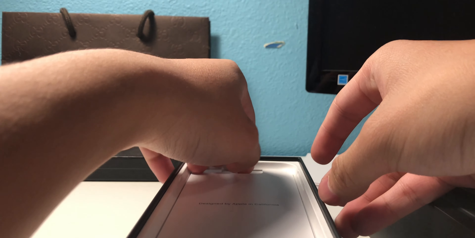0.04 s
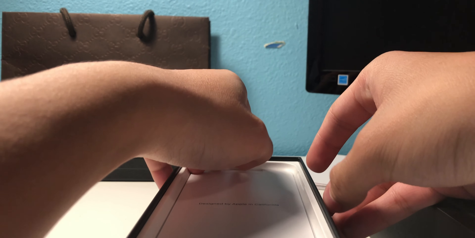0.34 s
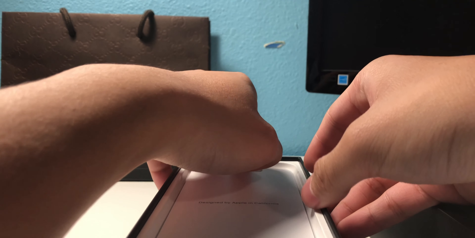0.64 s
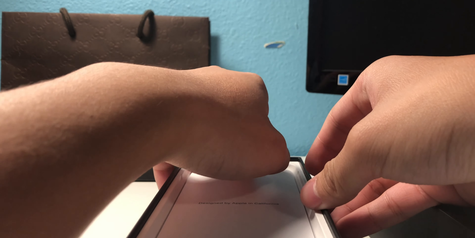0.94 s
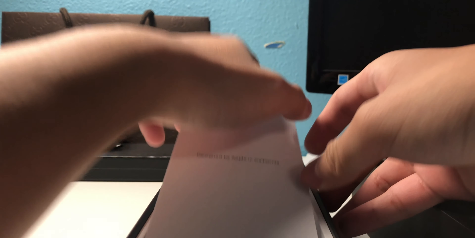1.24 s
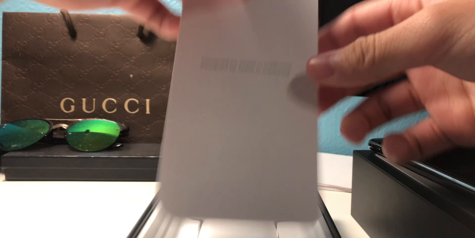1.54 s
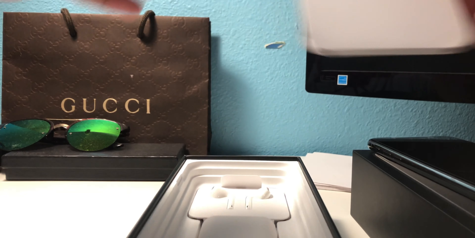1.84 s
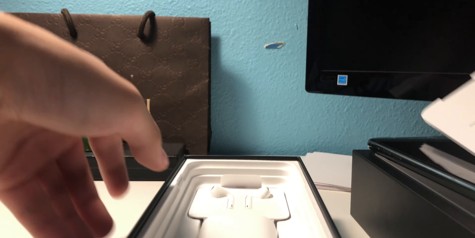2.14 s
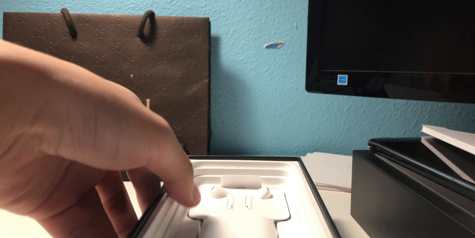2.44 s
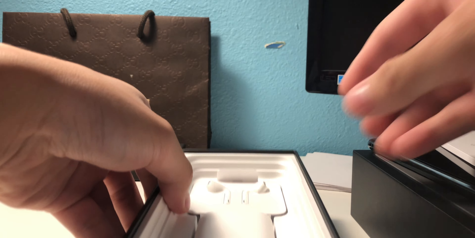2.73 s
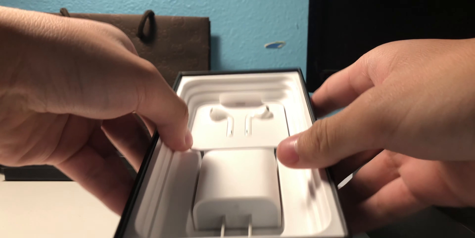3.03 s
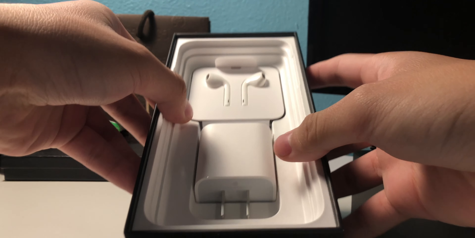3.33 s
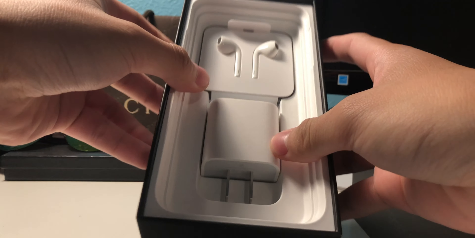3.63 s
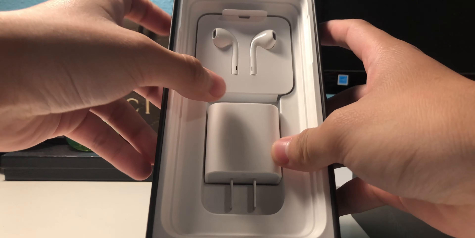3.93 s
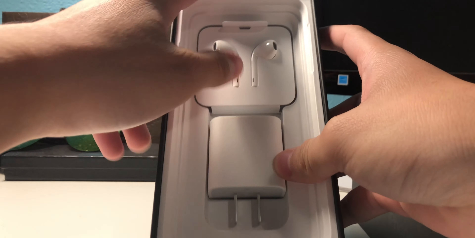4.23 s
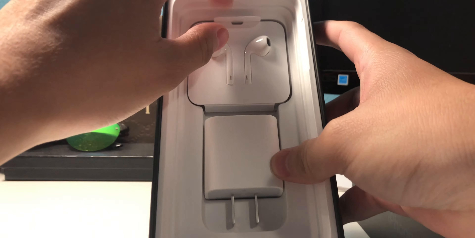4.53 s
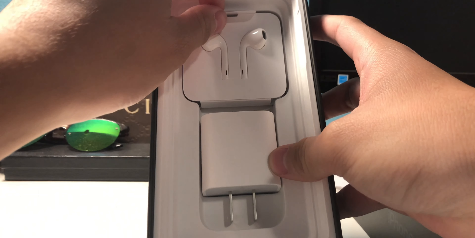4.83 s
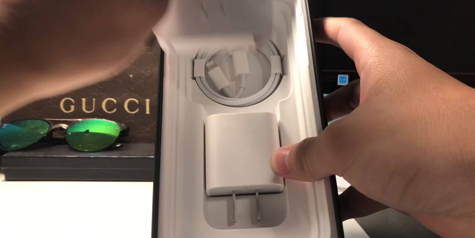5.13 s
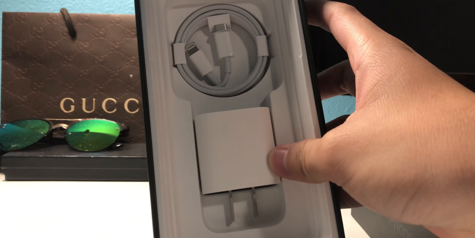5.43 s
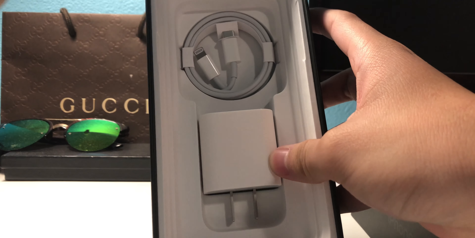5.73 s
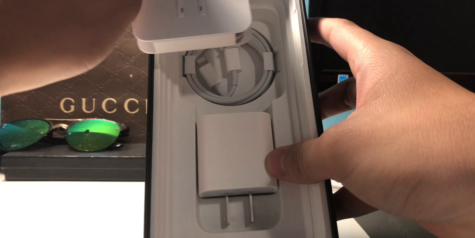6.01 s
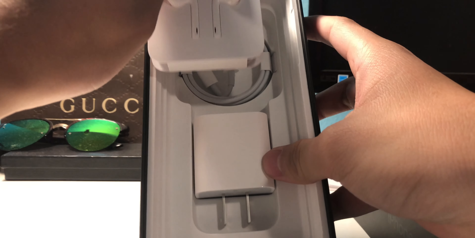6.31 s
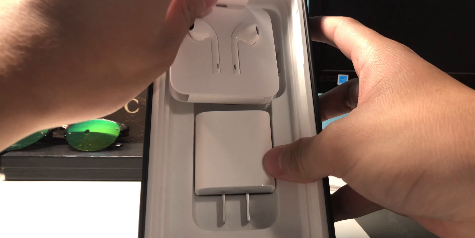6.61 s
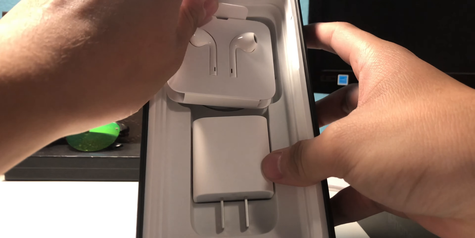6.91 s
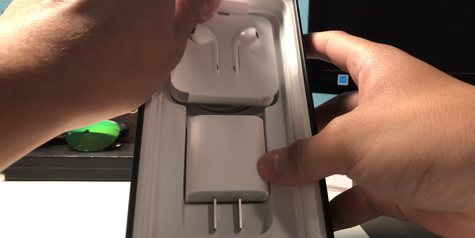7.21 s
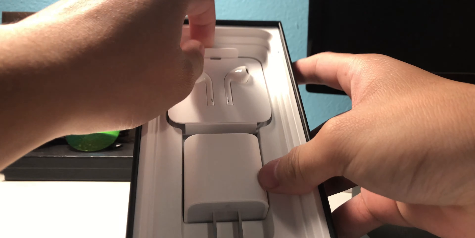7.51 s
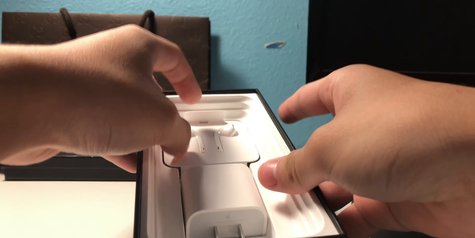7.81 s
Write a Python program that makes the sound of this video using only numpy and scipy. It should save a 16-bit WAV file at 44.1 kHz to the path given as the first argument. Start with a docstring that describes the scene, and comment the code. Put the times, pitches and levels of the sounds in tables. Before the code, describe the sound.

Hands unpack a small cardboard box close by, card scraping and clicking lightly, with dull bumps in a quiet room.

```python
"""Card and paper slide and catch as hands unpack a small box over a desk, close by in a small room.
Stick-slip friction excites a sleeve, inserts and a tray, each heard through its own resonances.
Impacts of edges and fingernails make taps; soft pushes drive the low modes of the held box and
the standing waves of the room. A faint hum and the noise of the room's air lie underneath."""
import sys
import numpy as np
from scipy import signal
from scipy.fft import rfft, irfft, next_fast_len
from scipy.io import wavfile
from scipy.ndimage import uniform_filter1d, map_coordinates

SR = 44100
rng = np.random.default_rng(int(sys.argv[2]) if len(sys.argv) > 2 else 0)


def store_wav(level_fs):
    """Save 16-bit WAV to argv[1]."""
    pcm = np.round(np.clip(np.atleast_2d(level_fs), -1, 1) * 32767)
    wavfile.write(sys.argv[1], SR, pcm.T.astype(np.int16))


N = 346626


def amp(db):
    """Amplitude ratio of a level in decibels."""
    return 10 ** (np.asarray(db) / 20)


def unit(x):
    """Normalisation to an rms of 1."""
    return x / np.sqrt(np.mean(x ** 2) + 1e-20)


def along(points, hz):
    """Interpolation of (f/Hz, value) points on a logarithmic frequency axis."""
    f, values = np.transpose(points)
    return np.interp(np.log(hz + 1), np.log(f + 1), values)


def wobble(per_s, size=N):
    """Smooth random modulation: a spline through per_s Gaussian knots a second."""
    knots = rng.standard_normal(int(size * per_s / SR) + 4)
    return map_coordinates(knots, [np.arange(size) * per_s / SR], order=2)


def filtered(x, response):
    """Linear filtering: the spectrum of x times a frequency response."""
    padded = next_fast_len(len(x) + 4096, True)
    return irfft(rfft(x, padded) * response(np.fft.rfftfreq(padded, 1 / SR)), padded)[:len(x)]


def minimum_phase(gain):
    """Causality: folding the cepstrum gives the minimum-phase response with this gain."""
    cepstrum = irfft(np.log(np.maximum(gain, 1e-5)))
    half = len(cepstrum) // 2
    cepstrum[1:half] *= 2
    cepstrum[half + 1:] = 0
    return np.exp(rfft(cepstrum))


def band(hz, lo_hz, hi_hz, order=4):
    """Band-pass gain with soft edges."""
    return 1 / np.sqrt((1 + (lo_hz / (hz + 1)) ** (2 * order)) * (1 + (hz / hi_hz) ** (2 * order)))


def bending(hz, cycles, corner_hz):
    """Dispersion: low bending waves travel more slowly in card, so they arrive later."""
    return np.exp(-2j * np.pi * cycles * np.log(1 + hz / corner_hz))


def add(track, at_s, sound):
    """Superposition of a sound on the track, starting at at_s."""
    start = max(round(at_s * SR), 0)
    track[start:start + len(sound)] += sound[:max(len(track) - start, 0)]


# spectrum of the room's air: (f/Hz, relative level/dB)
AIR_SPECTRUM = [(22, -22), (58, 0.5), (90, -3.5), (150, -6), (220, -17.5), (340, -17), (500, -22),
                (800, -29.5), (1800, -32.5), (8500, -34.5), (14000, -40), (16000, -45)]

def room_air():
    """Stationary random noise, strongest in the bass."""
    return amp(-61.5) * unit(filtered(rng.standard_normal(N), lambda hz: amp(along(AIR_SPECTRUM, hz))))


# tones of the hum: (f/Hz, relative level/dB)
HUM_TONES = [(59.2, -62.5), (118.4, -65), (145.3, -66.5)]

def hum():
    """Slow amplitude and phase modulation makes three low tones slightly unsteady."""
    out, t = np.zeros(N), np.arange(N) / SR
    for hz, db in HUM_TONES:
        out += amp(db + 0.46 * wobble(2.28)) * np.sin(2 * np.pi * hz * t + 0.59 * wobble(3.245))
    return amp(-0.5) * out


# reverberation time of the room: (f/Hz, T60/s)
ROOM_DECAY = [(200, 0.36), (2000, 0.21), (6000, 0.14), (14000, 0.16)]

def in_room(x, wet_db):
    """Reverberation: direct sound, a ceiling echo and a diffuse tail whose treble dies first."""
    hz, t, spectra = signal.stft(rng.standard_normal(SR // 3), SR, nperseg=256)
    tail = signal.istft(spectra * amp(-60 * t / along(ROOM_DECAY, hz)[:, None]), SR, nperseg=256)[1]
    tail *= 1 - np.exp(-(np.arange(len(tail)) / SR / 0.0031) ** 2)
    response = np.r_[1, amp(wet_db) * tail / np.linalg.norm(tail)]
    response[round(0.0087 * SR)] += amp(wet_db - 6.5)  # ceiling echo
    return signal.fftconvolve(x, response)


# low modes of the held box: (f/Hz, bandwidth/Hz, relative level/dB)
BOX_MODES = [(63.5, 17, -6.5), (130.4, 31, -1), (240, 17, -8), (314, 34, -10.5), (544, 89, -21)]
# standing waves between desk and walls: (f/Hz, relative level/dB, T60/s)
ROOM_MODES = [(116.9, -5, 0.63), (138.2, 4.5, 0.29), (161, -9, 0.66), (229.8, -2.5, 0.52), (336, 8.5, 0.45)]
# soft pushes on the box: (t/s, relative peak level/dB, hardness as gain above 320 Hz/dB)
PUSHES = [(0.804, -43.5, -1), (0.921, -43, 6), (0.98, -41, 1), (1.056, -52, -3), (1.372, -43.5, -14),
          (1.464, -45, -18), (1.709, -43.5, -2.5), (1.797, -50, -7), (2.083, -45, -17), (2.411, -31, -11.5),
          (2.534, -38.5, 4.5), (4.277, -28, -21.5), (4.482, -33, -17), (4.902, -25, -13.5),
          (5.899, -38, -21), (6.264, -34, -36), (6.324, -36, 10), (6.366, -34.5, -14), (6.63, -43.5, 11),
          (6.856, -32.5, -13), (7.125, -46, -3), (7.359, -28, -6.5), (7.64, -36, -24), (7.796, -41.5, -3.5)]

def box_thumps(size=16384):
    """Modal response: a push on the box disperses into a falling swoop and excites standing waves."""
    out, t, hz = np.zeros(N), np.arange(size) / SR, np.fft.rfftfreq(size, 1 / SR)
    body = np.sqrt(sum((amp(db) / np.hypot(1, (hz ** 2 - f ** 2) / (width * (hz + 1)))) ** 2
                       for f, width, db in BOX_MODES))
    boom = sum(amp(db - 60 * t / t60) * np.sin(2 * np.pi * f * t) for f, db, t60 in ROOM_MODES)
    boom *= 1 - np.exp(-t / 0.008)
    boom /= np.abs(rfft(boom)).max()
    shelf = np.clip(np.log2((hz + 1) / 160), 0, 1)
    for at_s, db, hardness_db in PUSHES:
        contact = amp(hardness_db * shelf) * band(hz, lo_hz=59, hi_hz=510, order=3)
        push = irfft(minimum_phase(body * contact) * bending(hz, cycles=1.52, corner_hz=40.6))
        push *= amp(db + 1) / np.abs(push).max()
        add(out, at_s - 0.004, push + amp(7) * signal.fftconvolve(push, boom)[:size])
    return out


# resonances of each piece: (f/Hz, bandwidth/Hz, level above plain card/dB)
SLEEVE = [(555, 62, 3.5), (738, 160, 9.5), (2170, 530, 2), (2700, 390, 2.5), (4030, 1700, 5.5),
          (5100, 310, 2), (6070, 300, 4), (7400, 390, 0)]
INSERTS = [(750, 83, 6.9), (1200, 140, 2.9), (2670, 100, 6), (3557, 640, 3), (8500, 730, 1.8),
           (13700, 2900, 7.7)]
TRAY_FLAP = [(541, 30, 6.8), (805, 160, 5.1), (1190, 115, 7.5), (1690, 130, 7.5), (3290, 520, 8.1),
             (4120, 320, 5.3), (5000, 270, 5.3), (5900, 170, 5.5), (6700, 330, 5.7), (7620, 210, 6.2),
             (8460, 180, 6.7), (11940, 1100, 4.7)]
BOX_WELL = [(795, 260, 8.7), (2200, 240, 6.3), (2760, 250, 3.6), (3260, 250, 3.9), (4900, 400, 3),
            (13200, 3100, 3.6)]
TRAY = [(457, 73, 4.3), (818, 180, 7.8), (1141, 160, 5.3), (1705, 160, 5.6), (3030, 670, 5.5),
        (4100, 710, 3), (5050, 320, 4.1), (5730, 370, 3.4), (7060, 480, 3.4)]
# the piece in the hands: (starting t/s, resonances)
PIECES = [(0, SLEEVE), (1.75, INSERTS), (2.95, TRAY_FLAP), (5.6, BOX_WELL), (6.1, TRAY)]

def card_resonance(hz, at_s):
    """Resonance: the piece held at time at_s raises the gain around each of its modes."""
    modes = [modes for start, modes in PIECES if start <= at_s][-1]
    return amp(sum(db / (1 + (2 * (hz - f) / width) ** 2) for f, width, db in modes))


# spectrum common to all taps: (f/Hz, relative level/dB)
TAP_SPECTRUM = [(120, -20), (280, 1.5), (500, -0.5), (2000, -2), (5000, -2.5), (8000, -3.5), (13500, -11.5),
                (16000, -19)]
# edges and nails striking card:
# (t/s, relative level/dB, hardness as tilt/(dB per octave), T60/s, ring f/Hz, ring level/dB)
IMPACTS = [ (0.054, -48.5, 0, 0.012, 650, 17), (0.146, -44, -3.5, 0.014, 643, 9),
           (0.163, -42.5, 0, .012, 635, 14), (0.281, -47, -1.5, .015, 640, 9),
           (0.3282, -35, 0.5, 0.0089, 1090, 12.5), (0.4, -48, -4.5, .014, 679, 5),
           (0.667, -49, 2, 0.017, 540, 21), (0.796, -48, -5, .018, 610, 15),
           (0.841, -48.5, 0.5, 0.026, 534, 18), (0.922, -42.5, -1.5, 0.009, 574, 13),
           (0.9786, -37, -1.5, .004, 600, 10.5), (0.991, -39.5, -4.5, 0.01, 4450, 11),
           (1.002, -41.5, -5, 0.0073, 5300, 9), (1.055, -29, -4, 0.0082, 5370, 21),
           (1.162, -45.5, -2, 0.014, 6320, 9), (1.356, -42, 4.5, 0.0082, 740, 19.5),
           (1.385, -39, -2.5, 0.031, 510, 12.5), (1.46, -42.5, -6, 0.064, 564, 31),
           (1.615, -36, -0.5, 0.017, 2540, 18.5), (1.69, -48, -1, .015, 2620, 15),
           (2.131, -55.5, 3.5, 0.01, 4560, 15), (2.241, -34.5, -1, 0.0052, 3850, 15.5),
           (2.368, -56, -3, .01, 4200, 8), (2.406, -40.5, -4, 0.057, 2070, 6.5),
           (2.445, -51, -3.5, .008, 4400, 11), (2.452, -51.5, -5.5, 0.011, 4500, 21),
           (2.665, -52.5, -0.5, 0.012, 6200, 3), (2.688, -47, 1, 0.024, 537, 10),
           (2.813, -44, 1.5, 0.0055, 1730, 4), (2.9874, -40.5, -6, 0.017, 1150, 6.5),
           (3.039, -57, -10, 0.017, 740, 7), (3.094, -53, -4.5, 0.015, 1160, -1),
           (4.269, -42.5, -7, 0.017, 510, 8.5), (4.381, -40.5, -5.5, 0.028, 970, 13.5),
           (4.461, -45, -5, 0.042, 520, 4), (4.5716, -49, -6.5, 0.0062, 5900, 26),
           (4.7456, -35, 0.5, 0.0055, 1600, 16.5), (4.871, -56.5, -1.5, 0.015, 1740, 4),
           (4.895, -40.5, -6.5, 0.025, 550, 7.5), (5.026, -34, 1, 0.0086, 4370, 15),
           (5.034, -34, 2, 0.011, 5300, 13), (5.046, -33, 3, 0.011, 1540, 14),
           (5.058, -33, 0.5, 0.0076, 3300, 9), (5.889, -33, -2, 0.021, 2320, 5.5),
           (6.3199, -26, -0.2, .005, 1850, 7), (6.348, -44, -6, 0.024, 2070, 11),
           (6.365, -42, -1, 0.091, 5960, 12), (6.393, -38.5, -7, 0.056, 560, 9.5),
           (6.411, -35, -3, 0.0071, 3000, 8.5), (6.593, -40, 0, 0.04, 3100, 1),
           (6.627, -31.5, -4.5, 0.02, 1090, 7.5), (6.6725, -45, -2, 0.012, 3950, 19),
           (6.736, -42, 0, 0.015, 1180, 17), (6.755, -44, -0.5, 0.076, 1380, 12),
           (6.791, -44.5, -3.5, 0.0064, 3180, 13.5), (6.833, -42, -1, 0.018, 850, 9.5),
           (7.094, -38.5, -3, 0.035, 3900, 10), (7.128, -30.5, -3, 0.014, 1090, 13.5),
           (7.158, -37.5, -3, 0.016, 966, 4), (7.18, -43, -0.8, 0.025, 1090, 6),
           (7.265, -35, -3, 0.033, 550, 17.5), (7.328, -40, -4, 0.013, 6270, 8),
           (7.352, -36.5, -8.5, 0.049, 770, -3), (7.388, -40.5, -1, 0.0096, 1540, 9),
           (7.575, -39, -1.5, .01, 1370, 11.5), (7.6181, -33.5, -0.5, 0.013, 1380, 11),
           (7.631, -35.5, -11.5, 0.058, 515, 15), (7.684, -34.5, -1.5, 0.0064, 4500, 4.5)]

def card_taps(size=4096):
    """Impact excitation: micro-impacts ring the struck spot, and harder contacts sound brighter."""
    out, t, hz = np.zeros(N), np.arange(size) / SR, np.fft.rfftfreq(size, 1 / SR)
    octaves = np.log2(np.maximum(hz, 250) / 2000)  # the tilt pivots about 2 kHz
    for at_s, db, tilt_db, t60, ring_hz, ring_db in IMPACTS:
        spot_db = ring_db / (1 + (np.log2((hz + 1) / ring_hz) / 0.63) ** 2)  # half-width 0.63 octave
        colour = amp(along(TAP_SPECTRUM, hz) + tilt_db * octaves + spot_db) * card_resonance(hz, at_s)
        rise_s = 0.00083 + 0.022 * t60 + 0.000099 * max(-tilt_db, 0)  # slower if long or soft
        chatter_db = 4 * wobble(per_s=888, size=size)
        envelope = amp(chatter_db - 60 * t / t60) * (1 - np.exp(-(t / rise_s) ** 2))
        force = rfft(rng.standard_normal(size) * envelope)
        # dividing out the force's broad spectral shape lets the card set the colour
        broad = np.sqrt(np.abs(uniform_filter1d(np.abs(force) ** 2, size=70)))
        tap = irfft(force * minimum_phase(colour / broad) * bending(hz, cycles=1.33, corner_hz=117.8))
        tap *= amp(db - 1.1) * np.sqrt(0.01 * SR) / np.linalg.norm(tap)  # energy as rms over 10 ms
        add(out, at_s, in_room(tap, wet_db=-15))
    return out


def friction_noise(lo_hz, hi_hz, db_per_octave, drift_db):
    """Friction noise through each piece in turn; its colour drifts as the contact point moves."""
    spectra = signal.stft(rng.standard_normal(N), nperseg=512)[2]
    drift = uniform_filter1d(rng.standard_normal(spectra.shape), 5, axis=0)  # smooth in frequency
    drift = uniform_filter1d(drift, 12, axis=1)  # and in time
    noise = signal.istft(spectra * amp(drift_db * unit(drift)), nperseg=512)[1][:N]
    slope = lambda hz: band(hz, lo_hz, hi_hz) * amp(db_per_octave * np.log2(np.maximum(hz / lo_hz, 1)))
    parts = np.split(noise, [round(start * SR) for start, _ in PIECES[1:]])
    return np.concatenate([unit(filtered(part, lambda hz: slope(hz) * card_resonance(hz, start)))
                           for part, (start, _) in zip(parts, PIECES)])


# strokes that pull off the sleeve, lay the inserts aside, prise the tray out and slide it home:
# (t/s, duration/s, relative level/dB, swell/dB, body offset/dB, hiss offset/dB, grain depth/dB)
STROKES = [ (0.135, 0.053, -63, 9, 12, -6, 3.1), (0.2, 0.11, -60.5, 2, 4.5, 4.5, 4.6),
           (0.334, 0.089, -63, 13.5, 7.5, -14, 5.2), (0.45, 0.09, -66, 10, -0.5, -4.5, 2),
           (0.63, 0.12, -73.5, -11.5, 11, -13, 5), (0.982, 0.06, -58.5, 4, 6.5, -9, 8.9),
           (1.06, 0.16, -62.5, -4, 4, -4, 4.8), (1.207, 0.018, -51, 3.5, -6.5, -14, 2.7),
           (1.265, 0.021, -48.5, 4, -5.5, -8, 3.6), (1.31, 0.082, -61, 4, -5.5, -5, 4.3),
           (1.444, 0.023, -45.5, -1, -5, -7, 2.7), (1.482, 0.026, -43.5, 3.5, -12.5, -1, 2),
           (1.53, .17, -61, 3.5, -7, -1, 3.7), (1.75, 0.11, -60, 12, -4.5, -7, 0.81),
           (1.877, .19, -51.5, -4.5, -7.5, -7, 0.4), (2.08, 0.095, -69, 9, 5.5, -7, 4.5),
           (2.249, 0.036, -52, -1, -4, -20, 0.92), (2.32, 0.27, -65.5, 3, 0.5, -11, 1.8),
           (2.52, 0.018, -67, 2, 4, 0, 4), (2.63, 0.083, -61, 2.5, -2, -10.5, 2.6),
           (2.74, 0.12, -55.5, 0, 2.5, -10, 0.98), (2.975, 0.096, -72, -8, 6.5, -4, 4.6),
           (3.225, 0.044, -71.5, 11, 15.5, -10, 2.5), (3.395, 0.13, -67.5, -9, -4, -7, 3.3),
           (3.66, 0.12, -79, 0, 11, -9, 5.1), (3.88, 0.11, -73, -5, 8.5, -10, 4.7),
           (4.37, 0.082, -66, 3, 2, -2, 3.7), (4.711, 0.097, -64, -13, 0, -6, 4.5),
           (4.86, 0.15, -65, 2, 0, -14, 2.5), (4.981, 0.023, -52, 11, -8, -1, 2),
           (5.01, 0.039, -42, -2, -9, -2, 2.2), (5.07, 0.083, -64.5, -3, 2, -6, 2),
           (5.23, 0.11, -73.5, 7, 3.5, -8, 2.1), (5.77, 0.093, -70.5, 7, 4, -10, 1.6),
           (5.901, .15, -58.5, -6.5, -8, -3, 1.1), (6.188, 0.096, -51.5, 2.5, -7, -9.5, 0.79),
           (6.34, 0.27, -51, 6, -11, -7.5, 1.5), (6.596, 0.037, -46.5, 11, -9, -8, 2.2),
           (6.668, 0.051, -50.5, 12, -13.5, -17, 4.2), (6.813, 0.011, -52, 0, -4, 0.5, 2.3),
           (6.85, 0.2, -69.5, 1, 8, -9, 2.8), (7.099, 0.095, -57, 9, -4, -13, 5),
           (7.366, 0.017, -43.5, 4, -1.5, -4, 3.4), (7.4, 0.088, -55.5, 9, 6, -4.5, 1),
           (7.51, .06, -63, 10, 3, -7, 1.3), (7.584, 0.033, -46, 0, -4.5, -3.5, 1.6),
           (7.63, 0.065, -53, 5, 3, -3, 3.4), (7.71, 0.12, -68, 0.5, 10, -9, 3.1)]
ATTACK_DB_PER_S, RELEASE_DB_PER_S = 897, 604

def stroke_levels():
    """Incoherent sources add in power: body, scrape and hiss levels and power-weighted grain, in dB."""
    t = np.arange(N) / SR
    scrape = amp(-85 - wobble(7.3)) ** 2  # fingers shift faintly on the box between strokes
    body, hiss, grain = scrape * amp(9) ** 2, scrape * amp(5) ** 2, scrape * 5.5
    for start, length, db, swell_db, body_db, hiss_db, grain_db in STROKES:
        near = slice(*np.searchsorted(t, [start - 0.1, start + length + 0.15]))
        age = t[near] - start
        edges_db = ATTACK_DB_PER_S * np.minimum(age, 0) + RELEASE_DB_PER_S * np.minimum(length - age, 0)
        power = amp(db + swell_db * (np.clip(age / length, 0, 1) - 0.5) + edges_db) ** 2
        scrape[near] += power
        body[near] += power * amp(body_db) ** 2
        hiss[near] += power * amp(hiss_db) ** 2
        grain[near] += power * grain_db
    return *(10 * np.log10([body, scrape, hiss])), grain / scrape


def sliding_card():
    """Stick-slip friction: fibres catch and let go, modulating body, scrape and hiss together."""
    body_db, scrape_db, hiss_db, grain_db = stroke_levels()
    slips = amp(grain_db * (0.43 * wobble(700) + 1.11 * wobble(110)))
    slips /= np.exp((grain_db * np.log(10) / 20) ** 2)  # offsets the power that deep grain adds
    body = amp(body_db - 2.34) * friction_noise(340, 1650, db_per_octave=-4, drift_db=3)
    scrape = amp(scrape_db - 1.6) * friction_noise(1680, 6150, db_per_octave=-2, drift_db=3.5)
    hiss = amp(hiss_db - 3.3) * friction_noise(7030, 15100, db_per_octave=-12, drift_db=-0.5)
    box_shake = amp(0.6 * body_db - 27) * friction_noise(86.5, 307, db_per_octave=1, drift_db=5.5)
    return in_room(slips * (body + scrape + hiss) + box_shake, wet_db=-16)[:N]


def scene():
    """Superposition of the handling sounds and the quiet room, in one channel."""
    return (sliding_card() + card_taps() + box_thumps() + room_air() + hum())[None]


def record(dry):
    """Band limiting: the phone's microphone cuts off steeply in the top treble."""
    return filtered(dry[0], lambda hz: band(hz, lo_hz=1, hi_hz=15900, order=60))[None]


dry = scene()
out = record(dry)
store_wav(out)
```